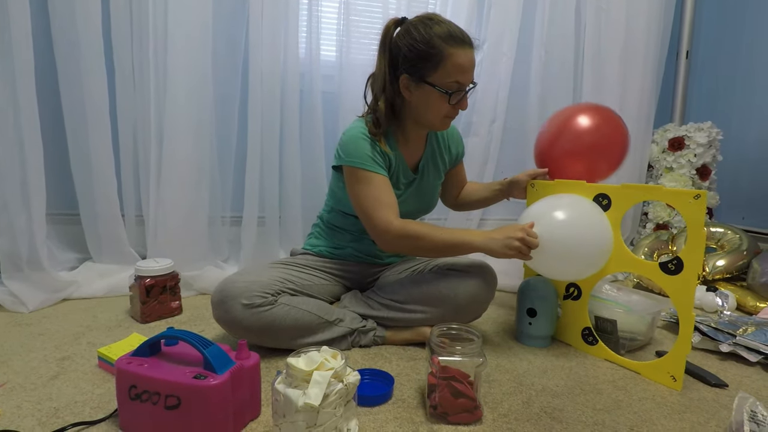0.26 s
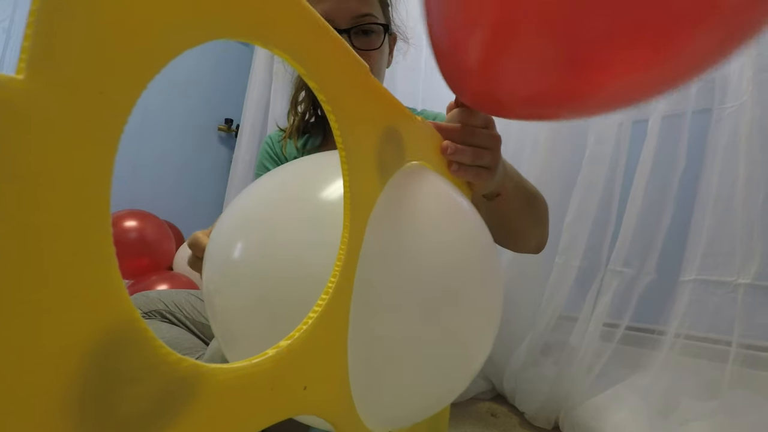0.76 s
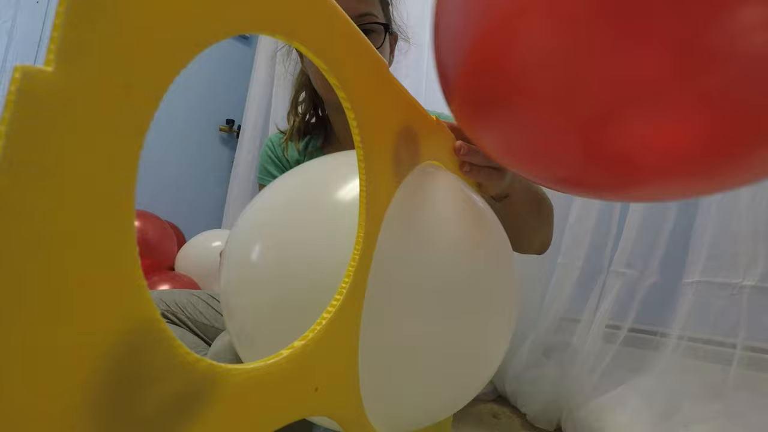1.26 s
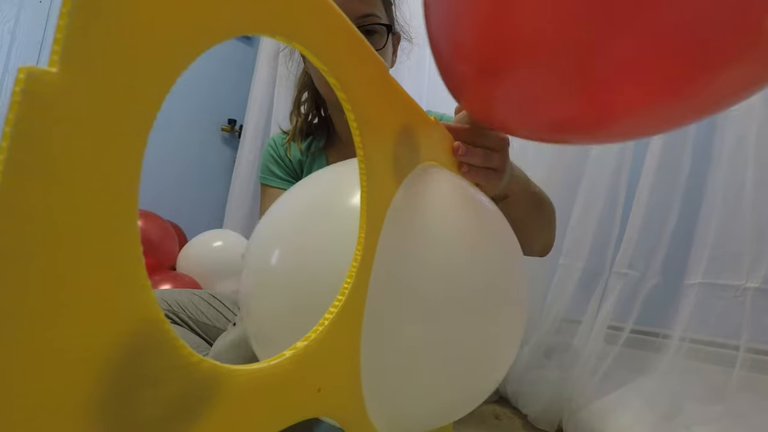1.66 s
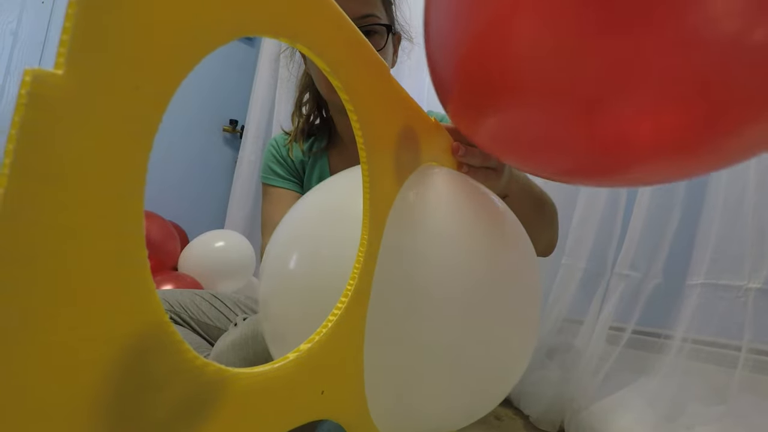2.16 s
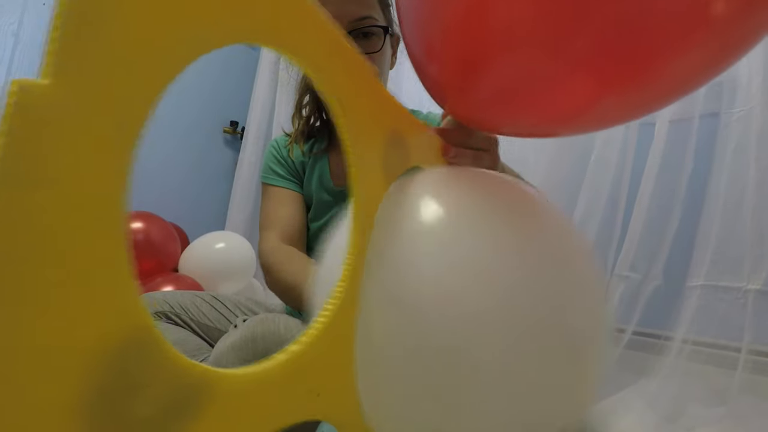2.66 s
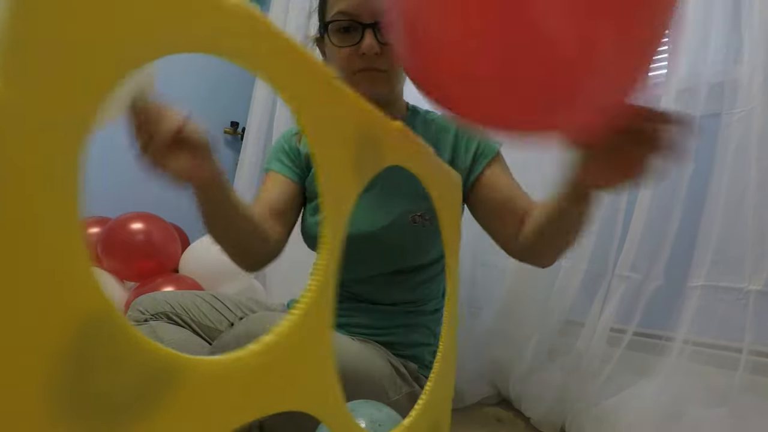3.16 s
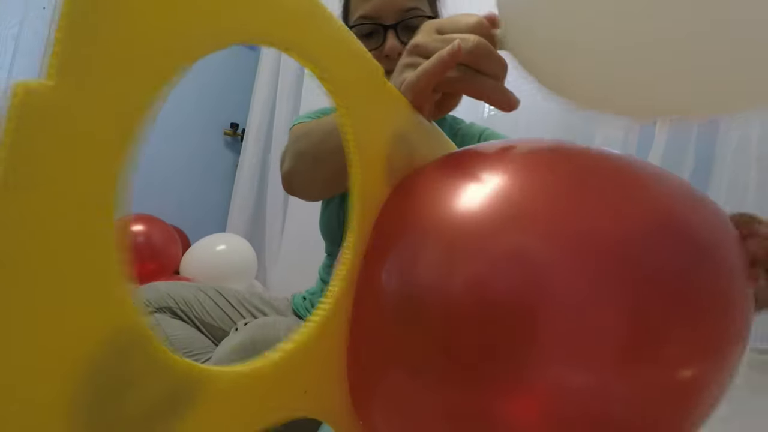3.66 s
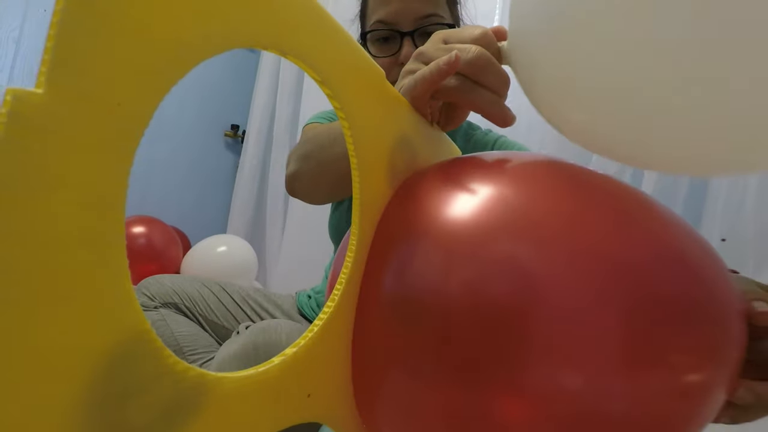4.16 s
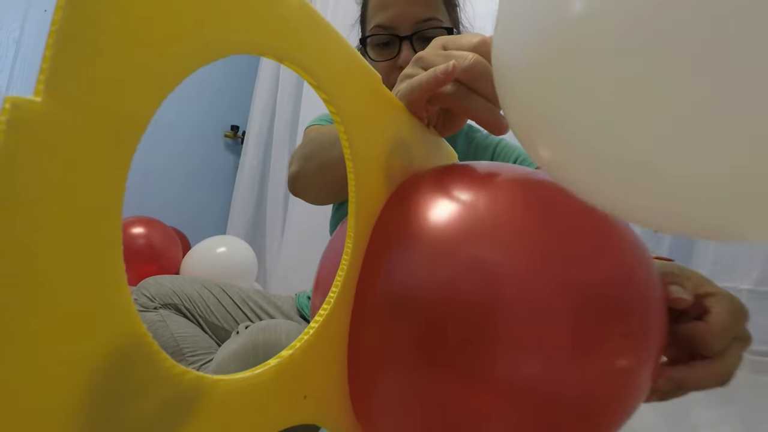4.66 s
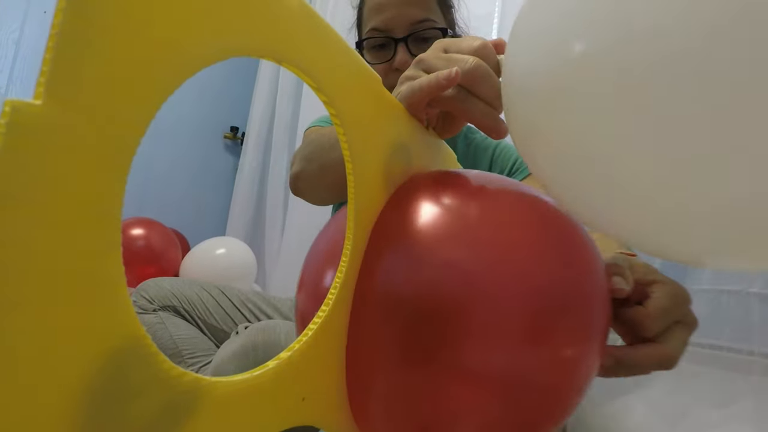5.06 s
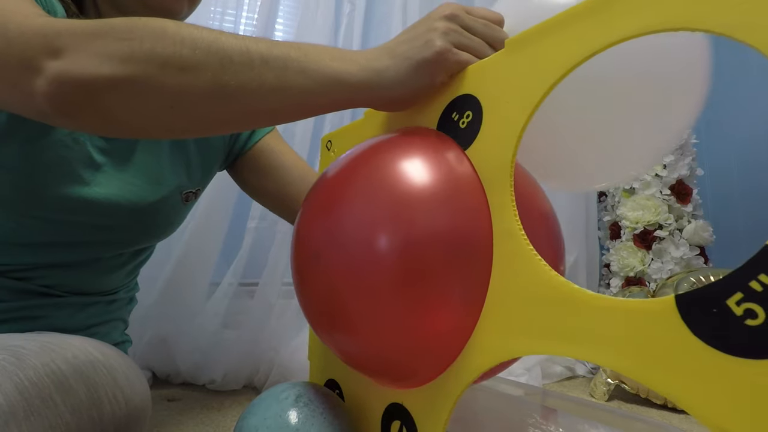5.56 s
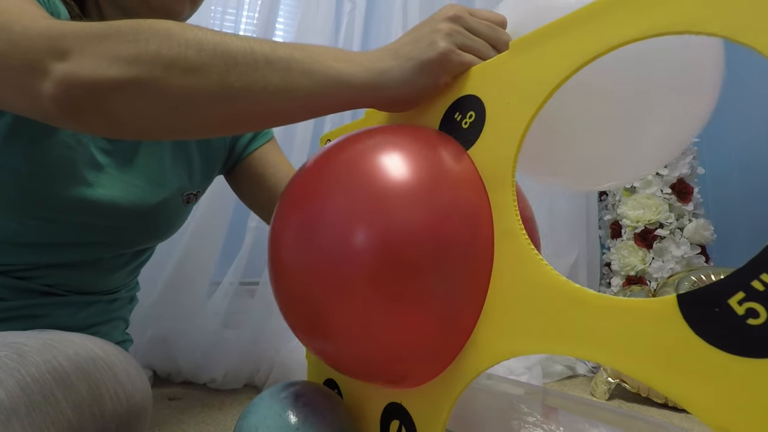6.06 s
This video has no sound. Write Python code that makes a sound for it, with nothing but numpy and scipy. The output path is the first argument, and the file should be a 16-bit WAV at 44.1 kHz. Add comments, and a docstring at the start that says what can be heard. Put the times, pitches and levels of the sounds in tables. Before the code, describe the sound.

Air hisses in surges from latex balloons while skins squeak, groan and bump against a plastic board, then two long loud blasts rush out.

```python
"""Air hisses in surges through the necks of latex balloons: noise with two neck resonances, chopped by flaps.
A neck also drones and whistles: gliding harmonic tones. The balloons are sized in the holes of a plastic board.
Taut skins groan (slip pulses through a body filter), slide (filtered noise) and boom when bumped (decaying modes).
Clothes or a hand rustle and a pinched neck hisses thinly (both high, flickering noise).
The board ticks (short rings) and rumbles (low noise) as it is handled in a small, still room."""
import sys
import numpy as np
from scipy import signal
from scipy.fft import rfft, irfft, next_fast_len
from scipy.io import wavfile
from scipy.ndimage import uniform_filter1d

SR = 44100
rng = np.random.default_rng(int(sys.argv[2]) if len(sys.argv) > 2 else 0)


def generate_wav(signal):
    """Clip the signal to [-1, 1] and save it as 16-bit WAV at the path in sys.argv[1]."""
    frames = np.transpose(np.atleast_2d(signal))
    scaled = np.clip(frames, -1, 1) * 32767
    pcm = np.round(scaled).astype(np.int16)
    wavfile.write(sys.argv[1], SR, pcm)


N = 278271
TIME = np.arange(N) / SR

# contact noise of skin and plastic: f/Hz, relative level/dB
SLAP_SPECTRUM = [(150, -4.5), (320, 5.5), (600, -5), (1200, -4), (2300, -15.5), (4500, -17.5), (7000, -21),
                 (10000, -27.5), (15000, -54)]


def amp(db):
    """Decibels to gain."""
    return 10 ** (np.asarray(db) / 20)


def unit(x):
    """Scales to rms 1."""
    return x / np.sqrt(np.mean(x ** 2) + 1e-20)


def read(points, hz):
    """A table over frequency, interpolated on a log-frequency axis."""
    f, value = np.transpose(points)
    return np.interp(np.log(hz + 1), np.log(f + 1), value)


def follow(rows):
    """A gate open over a table's time span, then its columns at every sample."""
    s, *columns = np.transpose(rows)
    inside_s = np.minimum(TIME - s[0], s[-1] - TIME)
    gate = np.clip(inside_s / .012 + .5, 0, 1)
    return [gate] + [np.interp(TIME, s, c) for c in columns]


def colour(x, points):
    """Causal minimum-phase filter with the given spectrum."""
    log_gain = np.log(amp(read(points, abs(np.fft.fftfreq(8192, 1 / SR)))))
    taps = np.fft.ifft(np.exp(np.conj(signal.hilbert(log_gain)))).real
    return signal.oaconvolve(x, taps[:len(taps) // 2])[:len(x)]


def band(x, lo_hz, hi_hz):
    """The part of x between two frequencies."""
    size = next_fast_len(N)
    hz = np.fft.rfftfreq(size, 1 / SR)
    return irfft(rfft(x, size) * ((hz >= lo_hz) & (hz < hi_hz)), size)[:N]


def wander(rate_hz):
    """Random line of rms 1 through rate_hz knots a second."""
    knots = rng.standard_normal(8192)
    return unit(np.interp(TIME * rate_hz, np.arange(len(knots)), knots))


def add(mix, s, sound):
    """Lays a sound into the mix at time s."""
    part = mix[round(s * SR):][:len(sound)]
    part += sound[:len(part)]


def swell(t, full_s, until_s, rise_s, release_s):
    """Attack, hold and release as a gain; both slopes are straight in dB."""
    knee_db = 20.5  # change within one rise or release time
    early = np.maximum(full_s - t, 0) / rise_s
    late = np.maximum(t - until_s, 0) / release_s
    return amp(-knee_db * (early + late))


def strokes(rows):
    """Gain of events that each swell to a peak and die away, summed in power."""
    gains = [amp(db) * swell(TIME, s, s, rise, release) for s, db, rise, release in rows]
    return np.sqrt(sum(gain ** 2 for gain in gains))


def still_air():
    """Steady room noise with a fixed spectrum."""
    # room noise: f/Hz, relative level/dB per Hz
    air_spectrum = [(20, -16), (60, -28), (120, -17), (175, 3), (260, -7.5), (450, -14.5), (650, -11.5),
                    (1000, -19.5), (2000, -26.5), (6000, -33), (9500, -30), (12000, -40), (15500, -56)]
    # rms level/dB
    air_db = -45.5
    return amp(air_db) * unit(colour(rng.standard_normal(N), air_spectrum))


def room(x, wet_db):
    """Sparse random reflections that die at each frequency's own rate: the tail of a carpeted, curtained room."""
    # decay of the room: f/Hz, t60/s
    room_decay = [(100, 0.31), (500, 0.093), (3000, 0.15), (12000, 0.051)]
    taps = rng.standard_normal(SR // 2) * (rng.random(SR // 2) < .06)
    hz, t, z = signal.stft(taps, SR, nperseg=256)
    tail = signal.istft(z * amp(-60 * t / read(room_decay, hz)[:, None]), SR)[1]
    pre_delay = np.zeros(SR // 250)
    tail = np.concatenate([pre_delay, tail / np.linalg.norm(tail)])
    return x + amp(wet_db) * signal.oaconvolve(x, tail)[:N]


def handling(trim_db=-1):
    """Low rumble of the board being held and shifted: noise swelling with each movement."""
    # shifts of the board: strongest t/s, level before trim/dB, rise/s, release/s
    shifts = [(.37, -35, 0.018, .3), (.57, -25.5, 0.12, 1.5), (1.08, -29.5, .1, 0.22),
              (2.81, -22.5, .2, 0.3), (3.37, -19, 0.025, 0.44), (4.1, -26.5, 1.37, 1.24),
              (4.33, -29, 0.25, .4), (5.22, -36, .3, 1.55)]
    # rumble: f/Hz, relative level/dB per Hz
    rumble_spectrum = [(8.8, -17), (15, 3.5), (43, 2.5), (108, -4.5), (145, -4), (160, -4), (210, -52),
                       (350, -120)]
    return amp(trim_db) * strokes(shifts) * unit(colour(rng.standard_normal(N), rumble_spectrum))


def slap(t, t60_s, rise_s=0.00062):
    """A short burst of contact noise that builds as the surfaces meet."""
    noise = unit(colour(rng.standard_normal(len(t)), SLAP_SPECTRUM))
    return noise * amp(-60 * t / t60_s) * (1 - np.exp(-t / rise_s))


def ticks(ring_t60_s=0.02, snap_t60_s=0.032):
    """Fingers on the plastic board: one quickly dying ring and a snap of contact noise."""
    # ticks: t/s, ring level/dB, ring f/Hz, snap level/dB
    tick_rows = [(1.283, -21, 725, -32), (2.891, -26, 940, -47), (2.934, -28.5, 600, -44),
                 (2.968, -27.5, 776, -35), (3.016, -26, 450, -28.5), (3.023, -25.5, 650, -44),
                 (3.201, -37, 1330, -45), (3.479, -25, 1050, -22)]
    out, t = np.zeros(N), np.arange(SR // 5) / SR
    for s, db, hz, snap_db in tick_rows:
        ring = amp(db - 60 * t / ring_t60_s) * np.sin(2 * np.pi * hz * t)
        add(out, s, ring + amp(snap_db) * slap(t, snap_t60_s))
    return out


def bumps(rise_s=0.0013, slap_t60_s=0.062):
    """A soft push rings the balloon's modes under a slap of the skin."""
    # bumps: t/s, ring level/dB, reference mode f/Hz, reference t60/s, slap level/dB
    bump_rows = [(0.36, -14.5, 157.7, 0.12, -27.5), (2.643, -15.5, 238, 0.049, -30.5),
                 (2.823, -25, 86, 0.092, -26), (2.834, -11, 168, 0.066, -25.5),
                 (2.846, -16.5, 229, 0.061, -40), (3.353, -18.5, 195.6, 0.11, -39),
                 (3.373, -22, 151.5, 0.14, -44), (3.443, -2, 95, 0.037, -19.5),
                 (3.455, -6.5, 190, 0.048, -29.5), (3.621, -17, 240.6, 0.084, -25),
                 (3.629, -5.5, 135.4, 0.055, -22), (3.892, -18.5, 200, 0.14, -18.5),
                 (4.06, -13.5, 192, 0.04, -22)]
    # balloon modes: ratio to reference f, relative level/dB, share of reference t60
    modes = [(.42, -9.5, 0.79), (1.001, 3, 1.46), (1.42, -3, 1.36), (2.05, -9, 0.84), (2.8, -32.5, .45),
             (4.3, -28, 1.1)]
    out, t = np.zeros(N), np.arange(SR // 2) / SR
    for s, db, hz, t60, slap_db in bump_rows:
        ring = np.zeros(len(t))
        for ratio, mode_db, share in modes:
            ring += amp(mode_db - 60 * t / (t60 * share)) * np.sin(2 * np.pi * hz * ratio * t)
        push = 1 - np.exp(-t / rise_s)
        add(out, s, amp(db) * ring * push + amp(slap_db) * slap(t, slap_t60_s))
    return out


def flickering_noise(rows, spectrum, flicker_db):
    """Coloured noise that swells with each row while its level flickers at random."""
    flicker = amp(flicker_db * wander(260))
    return strokes(rows) * flicker * unit(colour(rng.standard_normal(N), spectrum))


def squeezes():
    """Balloons squeezed through holes: latex dragged over plastic catches and lets go."""
    # squeezes through a hole: strongest t/s, level/dB, rise/s, release/s
    squeeze_rows = [(.76, -26.5, 0.097, 0.1), (2.83, -34.5, 0.18, .08)]
    return flickering_noise(squeeze_rows, SLAP_SPECTRUM, flicker_db=1.5)


def rustle_and_thin_hiss():
    """High noise: a faint rustle of clothes or a brushing hand, then a thin hiss of air from a pinched neck."""
    # the rustle, then the thin hiss: strongest t/s, level/dB, rise/s, release/s
    high_rows = [(2.99, -56, .35, 0.19), (5.305, -32.5, 0.11, 0.28)]
    # both: f/Hz, relative level/dB per Hz
    high_spectrum = [(2000, -28), (7000, -2), (9000, 2), (10500, -8), (12000, -16), (15000, -28)]
    return flickering_noise(high_rows, high_spectrum, flicker_db=1.0)


def slide(trim_db=-3, slips_per_s=600, smooth=0.093):
    """Skin sliding under the fingers: countless tiny random slips, over faint steady noise, drum on it."""
    # strokes: strongest t/s, level of the 280-750 Hz band before trim/dB, rise/s, release/s
    slide_rows = [(.37, -32, 0.012, 0.21), (.585, -23.5, 0.12, 0.22), (.785, -23.5, 0.18, 0.25),
                  (1.33, -35.5, 0.3, 0.7), (2.6, -38.5, 1.5, 0.65), (2.75, -32.5, 0.087, 0.19),
                  (3.92, -28, 0.13, 1.63), (5.21, -22, 0.11, 0.078), (5.49, -32, 0.1, 0.66)]
    # skin: f/Hz, relative level/dB per Hz
    skin_spectrum = [(60, -27), (120, -13.5), (200, -1.5), (310, 2), (390, -0.5), (500, -8), (650, -12.5),
                     (1200, -12), (2000, -26), (4000, -47), (12000, -54)]
    slips = rng.standard_normal(N) * (rng.random(N) < slips_per_s / SR)
    skin = colour(slips + smooth * rng.standard_normal(N), skin_spectrum)
    pressure = amp(trim_db) * strokes(slide_rows)
    return pressure * skin / np.std(band(skin, 280, 750))


def groans(jitter=.08, uneven=0.049, scrape=0.037):
    """Latex sticks and slips on a hole's rim, faster and louder with pressure; each slip kicks the balloon."""
    # groans: start t/s, strongest t/s, end t/s, slip rate at strongest/Hz, level at strongest/dB,
    # f above which the slips are soft/Hz
    groan_rows = [(.38, 0.462, .55, 186, -27, 250), (0.509, 0.561, 0.6, 86, -22, 2470),
                  (.568, 0.596, 0.66, 217, -17, 2470), (0.722, .785, 0.9, 370, -23, 4000),
                  (.8, 0.823, .85, 230, -23.5, 400), (1.278, 1.337, 1.42, 305, -29.5, 900),
                  (2.311, 2.327, 2.36, 335, -27, 1500), (2.781, 2.835, 2.85, 78, -16, 120),
                  (2.843, 2.886, 2.99, 165, -32, 200), (5.157, 5.208, 5.3, 336, -26.5, 3000)]
    # balloon body: f/Hz, relative level/dB
    body_spectrum = [(40, -14), (120, 12), (220, 5.5), (330, -3.5), (450, 1), (650, -21), (920, -15),
                     (1300, -18), (2000, -28), (5000, -48), (12000, -51)]
    fade_db, sag = 14.5, .1  # lighter pressure at both ends: quieter, and slower by this share
    out = np.zeros(N)
    for start, strongest, end, top_hz, db, soft_hz in groan_rows:
        gate, ease = follow([(start, 1), (strongest, 0), (end, 1)])
        hz = top_hz * (1 - sag * ease ** 2)
        level_db = db - fade_db * ease ** 2
        turns = np.cumsum(hz * (1 + jitter * wander(220))) / SR
        pulses = np.diff(np.floor(turns), prepend=0) * (1 + uneven * rng.standard_normal(N))
        slips = pulses - hz / SR  # mean removed
        grit = scrape * np.exp(-4 * (turns % 1)) * rng.standard_normal(N)
        softened = signal.lfilter([1], [1, -np.exp(-2 * np.pi * soft_hz / SR)], slips + grit)
        body = colour(softened, body_spectrum)
        running_rms = np.sqrt(uniform_filter1d(body ** 2, size=1500) + 1e-14)
        out += gate * amp(level_db) * body / running_rms
    return out


def whistle(third_db=2, fifth_db=-2, jitter=0.0051, fade_db_per_octave=50):
    """A pinched neck: thin reedy odd harmonics; the overtones fade as pitch rises above each glide's lowest."""
    # two whistles, each: t/s, pitch f/Hz, level of the fundamental/dB
    whistles = [
        [(1.99, 2176, -65), (2.025, 2190, -36.5), (2.06, 2160, -64)],
        [(5.47, 1074, -36), (5.51, 1042, -31.5), (5.55, 920, -32), (5.605, 925, -31), (5.635, 990.7, -33),
         (5.665, 1070, -47)],
    ]
    out = np.zeros(N)
    for rows in whistles:
        gate, hz, level_db = follow(rows)
        angle = 2 * np.pi * np.cumsum(hz * (1 + jitter * wander(400))) / SR
        fade_db = fade_db_per_octave * np.log2(hz / hz.min())
        tone = np.zeros(N)
        for k, db in [(1, 0), (3, third_db - fade_db), (5, fifth_db - fade_db)]:
            tone += amp(db) * np.sin(k * angle) / (1 + (k * hz / 5500) ** 8)
        out += gate * amp(level_db) * tone * (1 + 0.16 * wander(150))
    return out


def drone(rattle_trim_db=2, jitter=0.018, shimmer=1.0):
    """An emptying balloon's low, sinking tone; as the neck rattles, uneven swings add overtones and half lines."""
    # drone: t/s, level/dB, neck rattle before trim/dB
    drone_rows = [(1.29, -31, -8), (1.342, -24.5, -29), (1.378, -34, -12), (1.564, -30.5, -19),
                  (1.61, -35.5, -22), (1.674, -22, -14.5), (1.77, -20.5, -19.5), (1.846, -24.5, -9),
                  (1.988, -16, -27), (2.092, -23.5, -47), (2.15, -37.5, -8), (2.282, -26, -13.5),
                  (2.33, -37, -4)]
    # overtones: multiple of the pitch, relative level/dB
    overtone_rows = [(1.5, -6), (2, -8), (2.499, -17.5), (2.9, -13), (4, -21), (5.001, -16)]
    from_hz, to_hz, glide_s = 244, 194.5, .38  # pitch sinks as the skin slackens
    gate, level_db, rattle_db = follow(drone_rows)
    age_s = np.maximum(TIME - drone_rows[0][0], 0)
    hz = to_hz + (from_hz - to_hz) * np.exp(-age_s / glide_s)
    angle = 2 * np.pi * np.cumsum(hz * (1 + jitter * wander(120))) / SR
    overtones = np.zeros(N)
    for k, db in overtone_rows:
        overtones += amp(db) * np.cos(k * angle) * (1 + shimmer * wander(45.37))
    rattle = amp(rattle_db + rattle_trim_db)
    tone = np.cos(angle) * (1 + shimmer * rattle * wander(80)) + rattle * overtones
    return gate * amp(level_db) * np.sqrt(2) * tone


def flow(name, t):
    """One jet's surges: gains of hiss and rush, then neck resonance and lifts, set by the strongest surge."""
    # surges, from weak leaks to full blasts: jet, opened t/s, pinched t/s, rise/s, release/s,
    # hiss level at opening/dB, lower rush level at opening/dB,
    # neck resonance at opening f/Hz, its lift at opening/dB, upper lift/dB
    surges = [("A", 0.19, 0.32, 1.4, 0.12, -38, -48.5, 5300, 5.7, 1.8),
              ("A", 0.396, 0.63, 0.085, .3, -47, -46, 4600, 5.9, 0),
              ("A", .67, 0.704, 0.17, .05, -39, -44, 4600, 3, 1.8),
              ("A", 0.749, 0.91, .055, 0.15, -30, -34.5, 5800, 3.5, -2),
              ("A", 1.08, 1.2, 0.11, .05, -56.5, -51.5, 4300, 0, 0),
              ("A", 1.2365, 1.897, 0.042, 0.13, -30, -35, 5800, 3.2, -1.6),
              ("A", 1.71, 2.13, 0.41, .1, -38.5, -48.5, 8500, 0, 10),
              ("A", 2.2, 2.31, .14, 0.082, -32, -37, 4900, 8.6, 5.2),
              ("A", 2.4, 2.57, 0.11, .1, -53, -52, 3900, 0, 2),
              ("A", 2.615, 2.64, .14, .08, -46, -48.5, 3500, -5, 2),
              ("A", 3.46, 3.56, 0.051, 0.13, -45.5, -47.5, 4600, 2, 4),
              ("A", 3.59, 3.615, .06, .07, -43.5, -46.5, 5100, 2.2, 4),
              ("A", 3.72, 3.85, 0.07, .03, -42.5, -48, 4600, 3, 4.6),
              ("B", 3.865, 5.12, .025, 0.02, -20.5, -34, 4450, 3, 7),
              ("C", 5.135, 5.265, 0.024, 0.15, -22, -30, 5000, 6.6, 6),
              ("C", 5.44, 6.09, 0.15, 0.067, -25, -32.5, 4860, 4.6, 5.5),
              ("C", 6.304, 6.35, 0.3, .1, -49, -49.5, 4400, 3.6, 5.4)]
    settle_s, hiss_sag_db, rush_sag_db = 0.3, 6.5, 3  # pressure holds for a moment, then settles
    sink, sink_s = 0.17, 0.57  # the neck slackens: its resonance sinks by up to this share
    sharpen_db, sharpen_s = 14.5, 1.12  # and sharpens into an airy whistle if open this long
    hiss, rush, necks = [], [], []
    for jet_name, opened, pinched, rise, release, hiss_db, rush_db, hz, lift_db, upper_db in surges:
        if jet_name != name:
            continue
        age_s = np.clip(t - opened, 0, abs(pinched - opened))
        opening = swell(t, opened, pinched, rise, release)
        settled = 1 - np.exp(-(age_s / settle_s) ** 2)
        hiss.append(opening * amp(hiss_db - hiss_sag_db * settled))
        rush.append(opening * amp(rush_db - rush_sag_db * settled))
        neck_hz = hz * (1 - sink * (1 - np.exp(-age_s / sink_s)))
        neck_db = lift_db + sharpen_db * (age_s / sharpen_s) ** 3
        necks.append([neck_hz, neck_db, np.full(len(t), upper_db)])
    power = np.square(hiss)[:, None] + 1e-30
    neck = (power * necks).sum(0) / power.sum(0)
    return np.linalg.norm(hiss, axis=0), np.linalg.norm(rush, axis=0), *neck


def jet(name, spectrum, flutter, width_hz=620, upper_width_hz=480, narrowing=0.66, patchy_db=2.5):
    """Turbulence shaped by the two resonances of the neck and chopped by its flapping."""
    upper_hz, flap_hz = 7470, 71.9  # upper neck resonance; mean flap rate
    hz, t, z = signal.stft(rng.standard_normal(N), SR, nperseg=1024, noverlap=768)
    hiss_gain, rush_gain, low_hz, low_db, high_db = flow(name, t)
    f = hz[:, None]
    width = width_hz / amp(narrowing * low_db)  # the stronger the resonance, the narrower
    low_lift_db = low_db / (1 + ((f - low_hz) / width) ** 2)
    high_lift_db = high_db / (1 + ((f - upper_hz) / upper_width_hz) ** 2)
    patches = uniform_filter1d(rng.standard_normal(z.shape), size=6, axis=0)
    eddies = unit(uniform_filter1d(patches, size=24, axis=1))
    z = z * amp(read(spectrum, f) + low_lift_db + high_lift_db + patchy_db * eddies)
    low_share = 1 / (1 + (f / 2800) ** 6)
    hiss = signal.istft(z * (1 - low_share), nperseg=1024, noverlap=768)[1][:N]
    rush = signal.istft(z * low_share, nperseg=1024, noverlap=768)[1][:N]
    # running rms to 1: the resonances colour without adding power
    hiss = hiss / np.sqrt(uniform_filter1d(hiss ** 2, size=4000))
    rush = rush / np.sqrt(uniform_filter1d(rush ** 2, size=12000))
    flap_angle = 2 * np.pi * np.cumsum(flap_hz * (1 + 0.148 * wander(90))) / SR
    flaps = 1 + flutter * np.cos(flap_angle)
    return flaps * (hiss * np.interp(TIME, t, hiss_gain) + rush * np.interp(TIME, t, rush_gain))


def jets():
    """Three jets of air, each with its own colour and depth of flutter."""
    # jet colours: f/Hz, relative level/dB per Hz
    jet_a, jet_b, jet_c = [(600, -11), (1000, -13), (1500, -13), (2000, -8.5), (2900, -6), (4000, -3.5),
                           (5500, -2), (7000, -3.5), (8000, -2.5), (9000, -10.5), (10000, -15),
                           (11000, -22), (13000, -25.5), (15500, -36)], [(600, -14.5), (1200, -8.5), (1650, -11), (2200, -3), (2700, -5),
                                          (3200, 0.5), (4500, -0.5), (6500, -1.5), (8200, -4.5),
                                          (9400, -7.5), (10200, -19), (11500, -22.5), (12600, -22),
                                          (15500, -25.5)], [(600, -7), (1150, -7), (1550, -5.5), (2400, 1),
                                                         (3400, 2.5), (4600, 3.5), (6000, 4), (8000, -4.5),
                                                         (9200, -5), (10000, -14), (12000, -22.5),
                                                         (15500, -29)]
    return jet("A", jet_a, flutter=.1) + jet("B", jet_b, flutter=0.18) + jet("C", jet_c, flutter=0.065)


def scene():
    """Jets, skins and board over the still room, alike in both channels."""
    contacts = ticks() + bumps() + squeezes() + slide() + groans()
    small_sounds = contacts + rustle_and_thin_hiss() + whistle()
    close = still_air() + handling() + drone()  # without room tail
    mono = close + room(small_sounds, wet_db=-10.5) + room(jets(), wet_db=-12)
    return np.array([mono, mono])


def record(dry):
    """Smooth saturation rounds off the highest peaks; a linear-phase low-pass then limits the band."""
    edge_hz = 15480
    held = dry / (1 + (dry / .85) ** 6) ** (1 / 6)
    low_pass = signal.firwin(511, edge_hz, window=("kaiser", 9), fs=SR)
    return signal.oaconvolve(held, low_pass[None], "same")


dry = scene()
out = record(dry)
generate_wav(out)
```